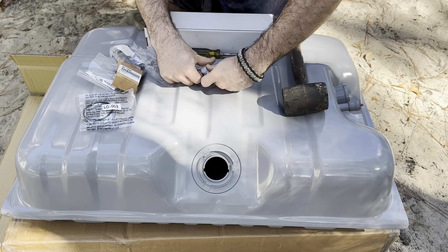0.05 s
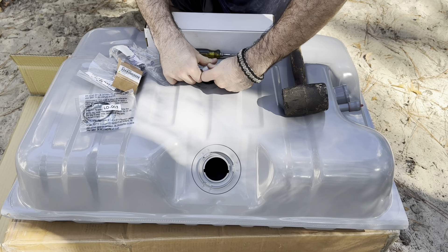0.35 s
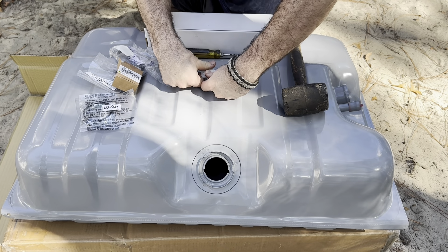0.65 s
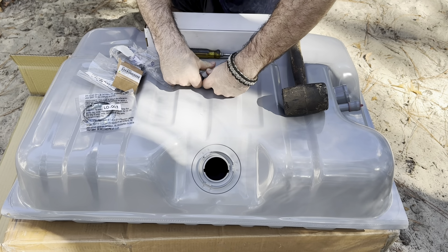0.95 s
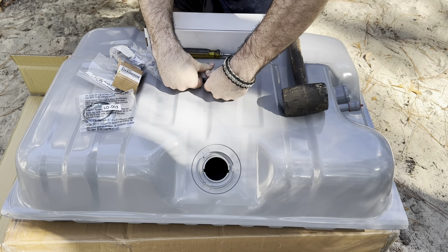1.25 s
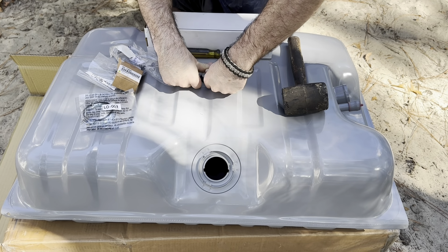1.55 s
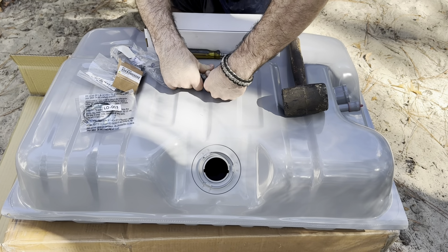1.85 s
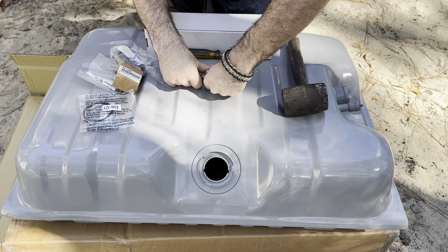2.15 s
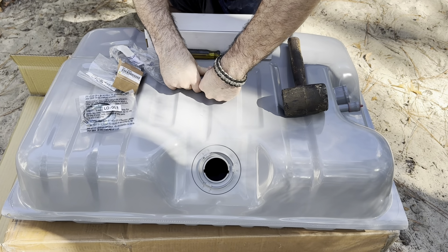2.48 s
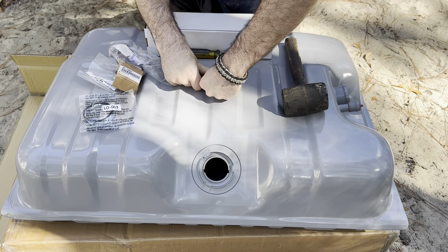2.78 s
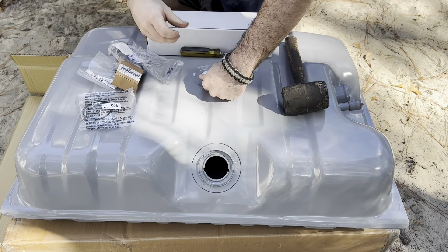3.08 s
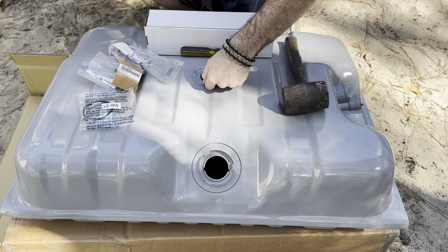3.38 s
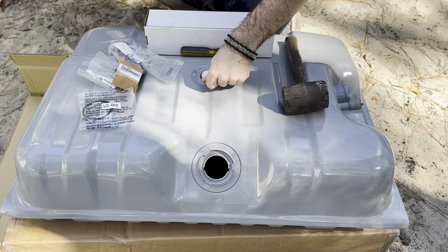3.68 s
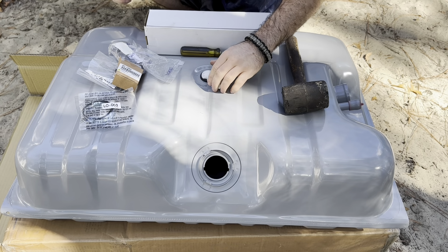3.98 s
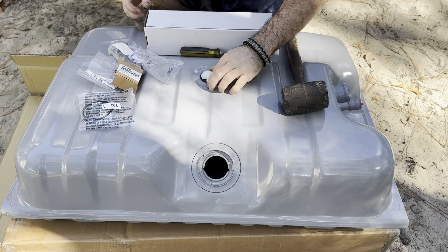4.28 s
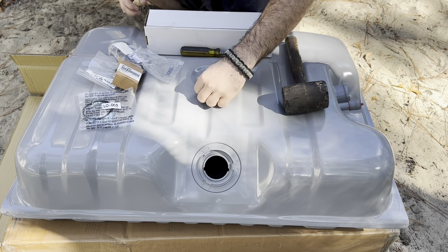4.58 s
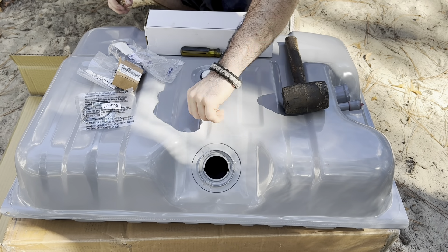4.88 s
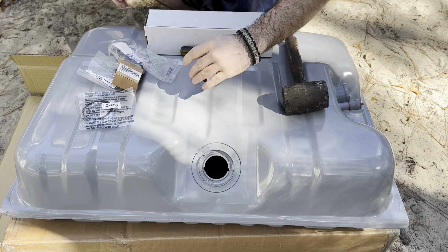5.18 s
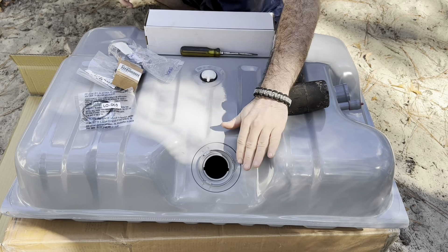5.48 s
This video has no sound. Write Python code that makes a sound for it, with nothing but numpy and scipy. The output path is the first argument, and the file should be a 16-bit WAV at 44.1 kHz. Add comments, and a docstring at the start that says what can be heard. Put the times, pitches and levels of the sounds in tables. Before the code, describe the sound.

A part knocks against a hollow steel tank, then snaps in with a loud, briefly ringing bang, over low panel rumble.

```python
"""A low, lumpy rumble: the panels of an empty sheet-steel tank flex as hands press a small part into it.
The part slips with a knock, then snaps home, and the impact sets the shell ringing in its normal modes.
Fingers tap the steel and slide over it with a hiss of friction, and a palm comes down on it.
Behind it all lie faint outdoor air and a low hum."""
import sys
import numpy as np
from scipy import signal
from scipy.fft import rfft, irfft, next_fast_len
from scipy.io import wavfile
from scipy.ndimage import uniform_filter1d

SR = 44100
rng = np.random.default_rng(int(sys.argv[2]) if len(sys.argv) > 2 else 0)


def wav_record(signal):
    """Record a signal, one row per channel, as 16-bit PCM in the file named by sys.argv[1]."""
    frames = np.transpose(np.atleast_2d(signal))
    bounded = np.clip(frames, -1, 1)
    # unit amplitude maps onto the largest positive 16-bit level
    quanta = np.round(bounded * 32767).astype(np.int16)
    wavfile.write(sys.argv[1], SR, quanta)


N = 248503
TIME = np.arange(N) / SR

# Spectrum of the rumbling panels. Each row: frequency in Hz, relative level in dB.
RUMBLE_SPECTRUM = [(13, -44.5), (22, -18.5), (48, -0.5), (81, 0), (101, -3.5), (204, -20.5), (241, -26.5),
                   (305, -35.5), (515, -46.5), (545, -46.5), (600, -48), (780, -74.5), (1320, -120)]
# Left-right coherence of the rumble. Each row: frequency in Hz, coherence from 0 to 1.
RUMBLE_COHERENCE = [(30, .94), (80, .96), (250, .9)]
# Left-right coherence of ringing and contact sounds. Each row: frequency in Hz, coherence from 0 to 1.
TANK_COHERENCE = [(150, .99), (700, .96), (1500, .8), (3000, .7), (6000, .55), (12000, .35)]
# Small clicks of the part and fingernails. Each row: start in seconds, level in dB, decay in seconds.
SMALL_CLICKS = [(0.3185, -53.5, 0.0012), (0.4181, -49, 0.0012), (0.826, -43, 0.0022), (0.8354, -28, 0.0014),
                (0.8393, -39, 0.0027), (1.2189, -47, 0.0017), (1.2286, -37.5, 0.0019),
                (1.4273, -63, 0.0015), (1.8127, -60.5, 0.0017), (2.9139, -58, 0.0023), (2.934, -59, 0.0027),
                (3.299, -63, .002), (4.3704, -58.5, .002), (4.4019, -56, 0.0022), (5.3818, -39.5, 0.0031)]


def amp(db):
    """Amplitude grows tenfold for every 20 dB."""
    return 10 ** (np.asarray(db) / 20)


def unit(x):
    """Normalisation to an rms of 1."""
    return x / np.sqrt(np.mean(x ** 2) + 1e-20)


def curve_at(points, hz):
    """Interpolation on a logarithmic frequency axis."""
    f, value = np.transpose(points)
    return np.interp(np.log(hz + 1), np.log(f + 1), value)


def add(mix, start, sound):
    """Superposition: a stereo sound joins the mix at its start in seconds."""
    part = mix[:, max(round(start * SR), 0):][:, :sound.shape[1]]
    part += sound[:, :part.shape[1]]


def noise(spectrum, coherence, size):
    """Random phases give stereo noise of rms 1; the share common to both sides sets its coherence."""
    hz = np.fft.rfftfreq(size, 1 / SR)
    left, independent = np.exp(2j * np.pi * rng.random((2, len(hz))))
    shared = np.clip(curve_at(coherence, hz), 0, 1)
    right = shared * left + np.sqrt(1 - shared ** 2) * independent
    return unit(irfft(np.array([left, right]) * amp(curve_at(spectrum, hz)), size))


def steadied(x, seconds):
    """Division by the running rms takes the slow swells out of a noise."""
    power = uniform_filter1d((x ** 2).mean(0), max(int(seconds * SR), 2))
    return x / np.sqrt(abs(power) + 1e-9)


def air(level_db=-64.5):
    """Outdoor air: a faint hiss that sounds wide because its coherence is low above the bass."""
    # Each row: frequency in Hz, relative level in dB.
    spectrum = [(210, -31), (350, -1), (417, -8), (445, -2), (632, -8), (718, -2), (816, -8), (1220, 0.1),
                (2380, -12), (2980, -23), (6310, -18), (8410, -32), (9860, -26), (11900, -36), (15900, -31)]
    # Each row: frequency in Hz, left-right coherence from 0 to 1.
    coherence = [(200, 0.9), (700, 0.1), (12000, 0.092)]
    return amp(level_db) * noise(spectrum, coherence, N)


def hum(hz=241, bandwidth_hz=9, first_db=-53.5, settled_db=-65.5, settle_s=.5):
    """Narrow-band noise is heard as a wavering drone; its level settles early on."""
    pole = np.exp(-np.pi * bandwidth_hz / SR) * np.exp(2j * np.pi * hz / SR)
    drone = signal.lfilter([1], [1, -pole], rng.standard_normal(N)).real
    level_db = settled_db + (first_db - settled_db) * np.exp(-TIME / settle_s)
    return amp(level_db) * steadied(drone[None], seconds=.077)


def rumble(gain_db=-2, lumps_db=3.5, lump_s=.049):
    """Forced vibration: the panel rumbles in uneven lumps, louder as the hands bear down."""
    # Pressure of the hands, as heard in the rumble. Each row: time in seconds, relative level in dB.
    pressure = [(0, -43), (.2, -35.5), (.45, -46), (.6, -38), (.78, -43.5), (1.0, -33.5), (1.33, -28.5),
                (1.55, -48), (1.8, -39), (2.15, -37), (2.45, -42.5), (2.66, -30), (2.8, -43), (3.8, -49),
                (5.25, -48), (5.5, -28), (5.63, -36.5)]
    lumps = unit(uniform_filter1d(rng.standard_normal(N), int(lump_s * SR)))
    level_db = gain_db + np.interp(TIME, *np.transpose(pressure))
    level_db += lumps_db * uniform_filter1d(lumps, size=500)
    return amp(level_db) * steadied(noise(RUMBLE_SPECTRUM, RUMBLE_COHERENCE, N), seconds=.026)


def slides(grain_db=3, rub_q=5, pitched_db=9):
    """Friction: skin catching on the steel gives a grainy hiss and a darker, loosely pitched rub."""
    # Each row: middle in seconds, half length in seconds, hiss in dB, rub in dB, rub pitch in Hz.
    strokes = [(0.321, 0.16, -82, -65, 1510), (0.586, 0.094, -76, -67.5, 1860),
               (.829, 0.017, -59, -52, 1510), (0.836, 0.0069, -58, -32, 2300), (.98, .02, -68, -75, 1500),
               (1.298, 0.26, -77, -67, 1800), (2.141, 0.042, -71.5, -72, 3010),
               (2.365, 0.032, -72, -69, 800), (2.956, 0.093, -76.5, -66, 1640),
               (3.201, .14, -77.5, -77, 2000), (4.425, 0.046, -69, -66, 3233),
               (4.538, 0.022, -74, -65, 1970), (4.717, .025, -75, -65.5, 2040),
               (4.843, 0.049, -56, -58, 950), (4.884, 0.04, -66, -51.5, 1606),
               (4.988, 0.024, -64.5, -71, 3040), (5.292, 0.018, -65, -68, 3070),
               (5.373, 0.068, -53, -72, 4020), (5.425, 0.057, -71, -56, 2600)]
    # Spectra of the fine hiss and the darker drag. Each row: frequency in Hz, relative level in dB.
    hiss_spectrum = [(3000, -18), (6000, 8), (10000, 19), (14500, 8.5), (16000, 15)]
    drag_spectrum = [(300, 8), (900, 1), (1700, -2.5), (2600, -4.5), (4000, -2.5), (6000, -3), (9000, -23)]
    out, t = np.zeros((2, N)), np.arange(-SR // 2, SR // 2) / SR
    for middle, half_length, hiss_db, rub_db, hz in strokes:
        hiss = noise(hiss_spectrum, TANK_COHERENCE, len(t))
        drag = noise(drag_spectrum, TANK_COHERENCE, len(t))
        pitched = signal.lfilter(*signal.iirpeak(hz, rub_q, fs=SR), drag)
        rub = unit(drag + amp(pitched_db) * pitched)
        roughness = unit(uniform_filter1d(rng.standard_normal(len(t)), size=90))
        envelope = np.exp(-(t / half_length) ** 2) * unit(amp(grain_db * roughness))
        stroke = envelope * (amp(hiss_db) * hiss + amp(rub_db) * rub)
        add(out, middle + t[0], stroke[:, t >= -middle])
    return out


def flexes(swell_cycles=1.2, boom_db=-17, boom_t60_cycles=30, shudder_db=-12):
    """Damped oscillation: a panel gives way, swings and shudders a few cycles, then booms on weakly."""
    # Each row: start in seconds, level of the swing in dB, pitch in Hz.
    panel_swings = [(.113, -27.5, 81), (.146, -23.5, 64), (.231, -27.5, 72.6), (.281, -25.5, 67.7),
                    (.497, -29, 76), (.672, -26, 68.4), (.8264, -14.5, 235), (.84, -14, 75),
                    (.85, -19.5, 263), (.876, -19, 67), (1.026, -26.5, 54), (1.107, -17, 87),
                    (1.243, -20.5, 101.2), (1.28, -25.5, 80), (1.318, -29, 68), (1.41, -30.5, 68),
                    (1.645, -29.5, 66), (1.695, -32.5, 73), (1.828, -29.5, 80), (1.913, -33, 54.95),
                    (2.078, -32, 60), (2.135, -26.5, 78), (2.178, -27, 81.57), (2.334, -30.5, 71),
                    (2.395, -32.5, 68), (2.468, -28.5, 65), (2.559, -18, 110), (2.572, -5, 72),
                    (2.842, -32.5, 71), (4.576, -37.5, 86), (5.292, -33.5, 72.4), (5.397, -25.5, 97),
                    (5.463, -18.5, 71.2)]
    out, t = np.zeros((2, N)), np.arange(SR) / SR
    for start, db, hz in panel_swings:
        cycles = t * hz
        progress = cycles / swell_cycles  # the swing peaks at 1
        swing = progress ** 2 * np.exp(1 - progress ** 2)
        boom_rise = 1 - np.exp(-(progress / 2) ** 2)
        boom = amp(boom_db) * boom_rise * np.exp(-np.log(1000) * cycles / boom_t60_cycles)
        shudder = amp(shudder_db) * steadied(noise(RUMBLE_SPECTRUM, RUMBLE_COHERENCE, SR), seconds=.03)
        tone = (swing + boom) * np.sin(2 * np.pi * cycles)
        add(out, start, amp(db) * (tone + swing * shudder))
    return out


def bursts(events, spectrum, rise_s):
    """A brief contact has a broad spectrum: each is a burst of noise with an exponential decay."""
    out, t = np.zeros((2, N)), np.arange(2048) / SR
    for start, db, decay_s in events:
        burst = steadied(noise(spectrum, TANK_COHERENCE, len(t)), seconds=.006)
        envelope = (1 - np.exp(-t / rise_s)) * np.exp(1 / 2 - t / decay_s)
        add(out, start, amp(db) * envelope * burst)
    return out


def clicks():
    """Direct radiation from the point of contact: snaps of the part, and its and the nails' clicks."""
    # The part snapping past the rim. Each row: start in seconds, level in dB, decay in seconds.
    snaps = [(.8365, -31, .002), (2.5585, -26, .0015), (2.561, -6, .003), (2.5905, -23, .002)]
    # Spectra of the snaps and the small clicks. Each row: frequency in Hz, relative level in dB.
    snap_spectrum = [(100, -25), (300, -5), (550, 0), (1300, -1), (2300, -5.5), (3800, -11), (5500, -23),
                     (10000, -22), (15000, -28)]
    click_spectrum = [(300, -12), (900, -1), (2000, -1), (4000, -1), (7000, -6), (10000, -1), (15000, -7)]
    return bursts(snaps, snap_spectrum, rise_s=.0008) + bursts(SMALL_CLICKS, click_spectrum, rise_s=.0003)


def mode_phases(hz):
    """Coherence falls with frequency, so high modes reach left and right further out of step."""
    left = 2 * np.pi * rng.random(hz.shape)
    offset = np.arccos(curve_at(TANK_COHERENCE, hz)) * rng.choice([-1, 1], hz.shape)
    return np.array([left, left + offset])


def weak_modes(t60_factor, count=1100, uneven_db=4):
    """Dense modes merge into a decaying noise; they lie sparser and more uneven towards the treble."""
    # Each row: frequency in Hz, relative spectral density in dB.
    spectrum = [(90, -24.5), (200, 1), (450, -6.5), (700, -5), (1200, -14), (1550, -8.5), (2100, -17),
                (3500, -19.5), (5000, -26.5), (7500, -34.5), (10000, -27), (15000, -39)]
    # Each row: frequency in Hz, t60 in seconds before damping by the hand.
    free_t60 = [(150, 0.45), (500, 0.52), (1200, 0.56), (2500, 0.45), (5000, 0.5), (12000, 0.27)]
    edges = np.linspace(np.sqrt(110), np.sqrt(15800), count + 1) ** 2
    band_hz = np.diff(edges)
    hz = (edges[:-1] + band_hz * rng.random(count)).astype(int)  # one mode in each band
    scatter_db = uneven_db * np.sqrt(np.linspace(0, 1, count)) * rng.standard_normal(count)
    strength = amp(curve_at(spectrum, hz) + scatter_db) * np.sqrt(band_hz)
    lines = np.zeros((2, SR // 2 + 1), complex)
    lines[:, hz] = strength * np.exp(1j * mode_phases(hz))
    sustained = steadied(unit(irfft(lines, SR)), seconds=.041)
    bin_hz, frame_s, frames = signal.stft(sustained, SR, nperseg=512)
    t60 = curve_at(free_t60, bin_hz)[:, None] * t60_factor
    decay = np.exp(-np.log(1000) * frame_s / t60)
    return signal.istft(frames * decay, SR, nperseg=512)[1][:, :SR]


def ring(t60_factor, clear_db=-.5, weak_db=-5.5, early_s=.045):
    """Free vibration: for one second the tank's clear normal modes decay over many weaker ones."""
    # Each row: frequency in Hz, relative level in dB, t60 in seconds before damping by the hand.
    steel_modes = [(208, -3, .3), (246, -7, .28), (273, -5, .3), (312, -10, .44), (359, -5, .3),
                   (406, -6.5, .3), (453, -5.5, .34), (510, -2, .35), (575, -10, .52), (734, -1, .31),
                   (857, -11, .4), (886, -13, .44), (966, -20, .58), (1030, -16, .48), (1082, -14, .65),
                   (1127, -13, .6), (1209, -9, .35), (1258, -10, .36), (1283, -13, .42), (1317, -11, .46),
                   (1456, -22, .62), (1604, -17, .4), (1711, -16, .42), (1868, -12, .4), (1947, -19, .44),
                   (2058, -16, .36), (2205, -19, .35), (2242, -18, .35), (2402, -20, .39), (2657, -19, .35)]
    t = np.arange(SR) / SR
    hz, db, t60 = np.transpose(steel_modes)[:, :, None]
    strength = amp(db) / np.sqrt(np.sum(amp(db) ** 2) / 2)
    decay = np.exp(-np.log(1000) * t / (t60 * t60_factor))
    clear = (strength * decay * np.sin(2 * np.pi * hz * t + mode_phases(hz))).sum(1)
    early_motion = 1 + np.exp(-t / early_s)  # the sheet loses its first, largest motion quickly
    return (amp(clear_db) * clear + amp(weak_db) * weak_modes(t60_factor)) * early_motion


def impact(corner_hz, build_s, t60_factor, spot_hz, lift_db, spot_q):
    """A soft blow acts as a low-pass filter on the modes, and each struck spot weights its own band."""
    t = np.arange(SR) / SR
    spreading = ring(t60_factor) * (1 - np.exp(-t / build_s))
    shell = signal.lfilter(*signal.butter(1, corner_hz, fs=SR), spreading)
    spot_band = signal.lfilter(*signal.iirpeak(spot_hz, spot_q, fs=SR), shell)
    return shell + (amp(lift_db) - 1) * spot_band


def blows(click_gain_db=-18.5):
    """Impulse excitation: the tank rings to the part's knocks, the hand's touches and each small click."""
    # The part striking the shell. Each row: start in seconds, level in dB, low-pass corner in Hz,
    # build-up in seconds, hand damping as a factor on t60, the spot's band in Hz, its lift in dB, its Q.
    knocks = [(.813, -47, 400, .0027, .46, 280, 13, 1.5), (.8281, -28, 300, 0.0006, .1, 213, 10, 1.8),
              (.8367, -29.5, 9500, 0.0038, 0.95, 2320, 5.5, 1.6),
              (0.8398, -45, 400, .003, 0.9, 325.5, 30.5, 14), (2.533, -37.5, 300, .013, .8, 200, -6, 2.4),
              (2.5606, -11, 12000, 0.022, 0.96, 525.6, 6.5, 1.8)]
    # Fingers and palm landing. Each row: start in seconds, level in dB, low-pass corner in Hz,
    # hand damping as a factor on t60, the spot's band in Hz.
    touches = [(2.364, -47, 700, 0.87, 800), (2.914, -50.5, 920, 0.54, 504), (2.985, -55, 1000, 0.82, 550),
               (3.625, -62.5, 2470, 1, 1500), (4.402, -56, 6000, 0.92, 3280),
               (4.698, -59, 2514, 0.81, 2510), (5.274, -56, 297, 0.86, 297), (5.386, -54.5, 2200, 1, 253),
               (5.448, -38, 300, 0.19, 290), (5.4535, -40.5, 1310, 0.97, 1650)]
    out = np.zeros((2, N))
    ring_under_hand = ring(t60_factor=.38)
    for start, db, *contact in knocks:
        add(out, start, amp(db) * impact(*contact))
    for start, db, corner_hz, t60_factor, spot_hz in touches:
        touch = impact(corner_hz, build_s=.001, t60_factor=t60_factor,
                       spot_hz=spot_hz, lift_db=6, spot_q=3.6)
        add(out, start, amp(db) * touch)
    for start, db, _ in SMALL_CLICKS:
        add(out, start, amp(db + click_gain_db) * ring_under_hand)
    return out


def scene():
    """Level and phase differences set the sound a little to the left; only the rumble stays central."""
    # Each row: frequency in Hz, left level minus right in dB.
    balance = [(30, 1.5), (70, 2.2), (300, 3.4), (1500, 3), (5000, 2), (12000, .5)]
    # Each row: frequency in Hz, phase lead of the left side in radians.
    phase_lead = [(700, 0), (1500, -0.28), (2800, .7), (6000, 2.1), (11000, 1.1)]
    sources = clicks() + blows() + flexes() + slides() + hum() + air()
    size = next_fast_len(N + SR)
    hz = np.fft.rfftfreq(size, 1 / SR)
    lean = amp(curve_at(balance, hz) / 2) * np.exp(1j * curve_at(phase_lead, hz) / 2)
    placed = irfft(rfft(sources, size) * np.array([lean, 1 / lean]), size)[:, :N]
    return placed + rumble()


def record(dry, cutoff_hz=15900):
    """Clipping holds the peaks at full scale; a steep low-pass filter then limits the band."""
    clipped = np.clip(dry, -1, 1)
    low_pass = signal.firwin(511, cutoff_hz, window=("kaiser", 9), fs=SR)
    return signal.oaconvolve(clipped, low_pass[None], "same")


dry = scene()
out = record(dry)
wav_record(out)
```